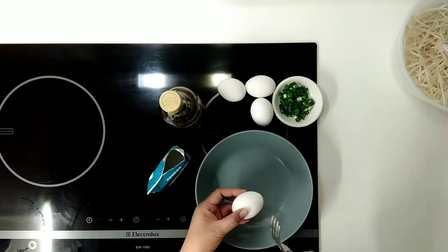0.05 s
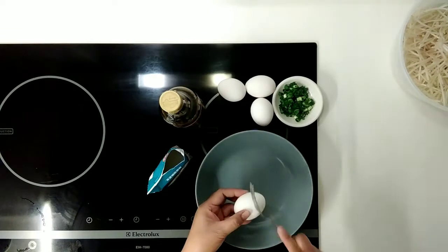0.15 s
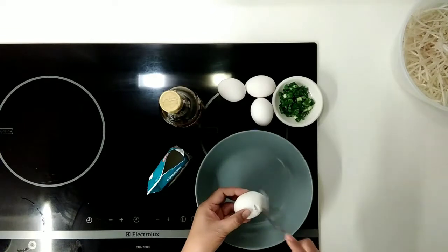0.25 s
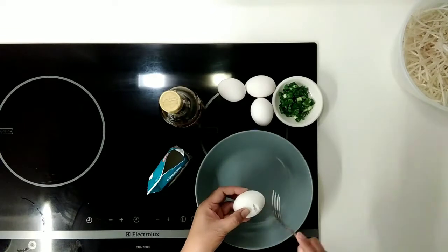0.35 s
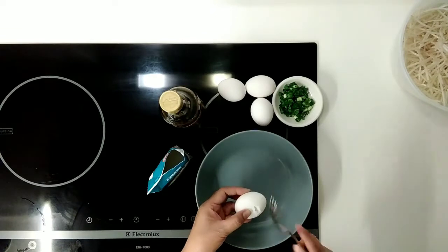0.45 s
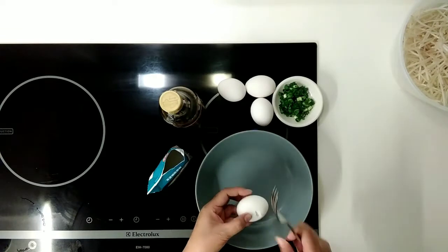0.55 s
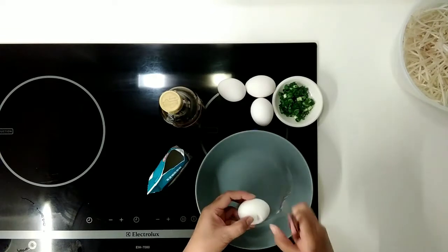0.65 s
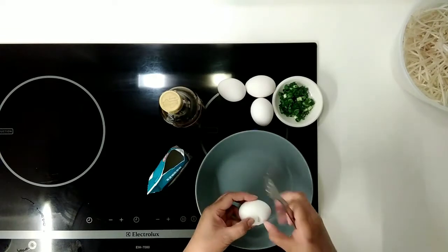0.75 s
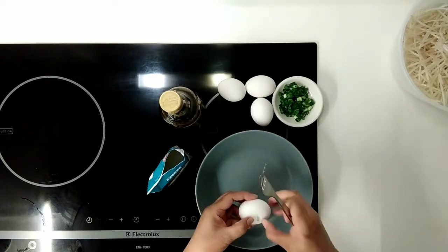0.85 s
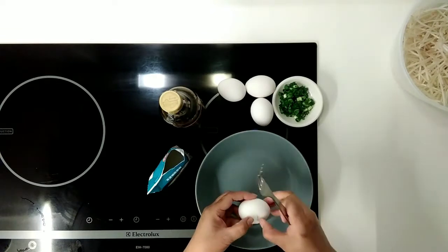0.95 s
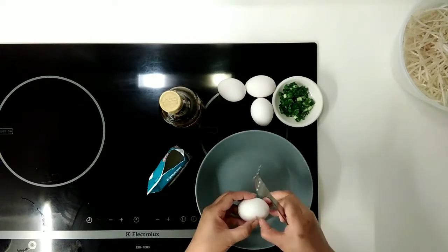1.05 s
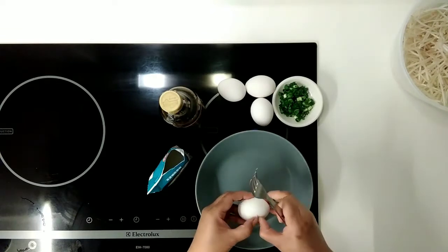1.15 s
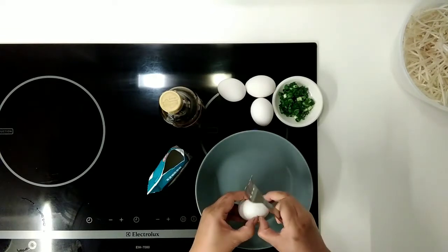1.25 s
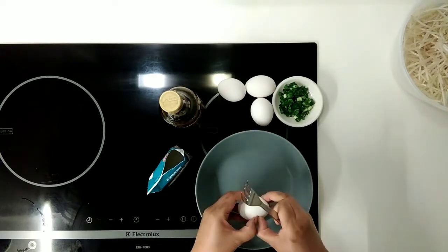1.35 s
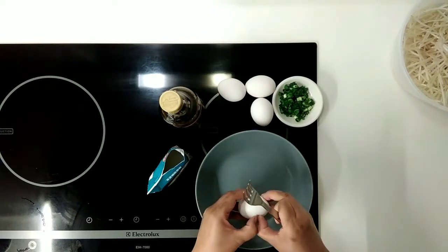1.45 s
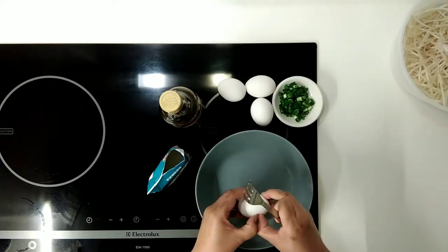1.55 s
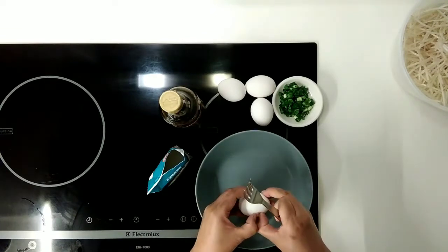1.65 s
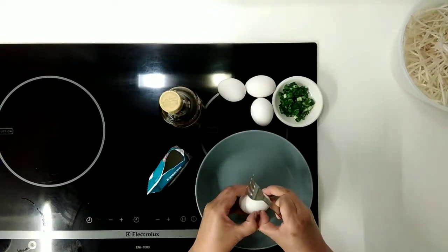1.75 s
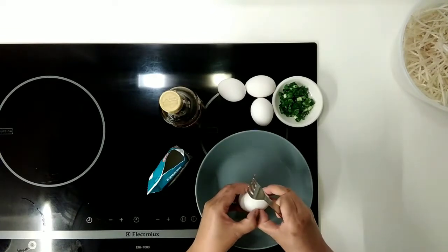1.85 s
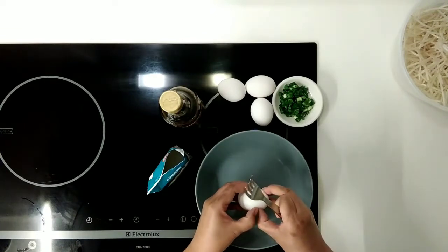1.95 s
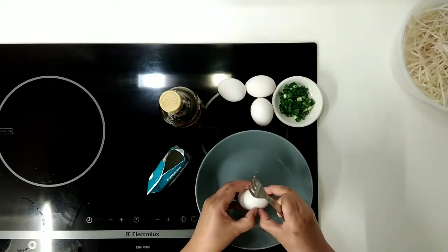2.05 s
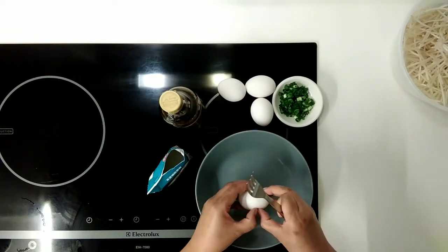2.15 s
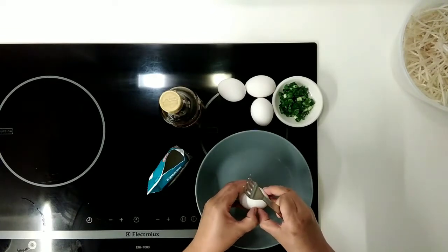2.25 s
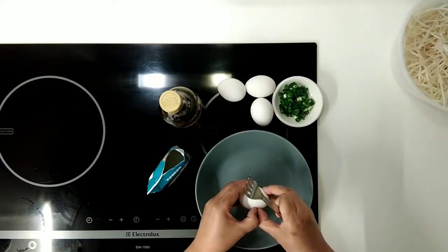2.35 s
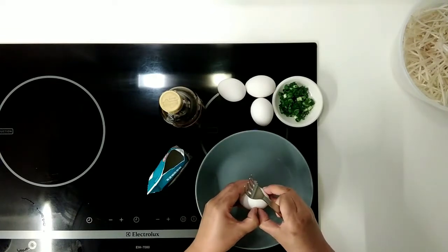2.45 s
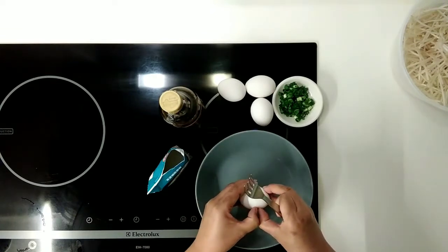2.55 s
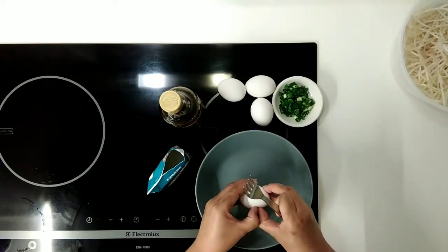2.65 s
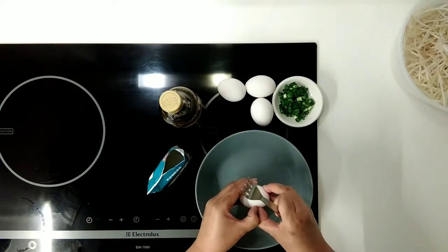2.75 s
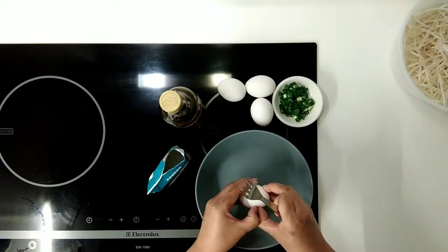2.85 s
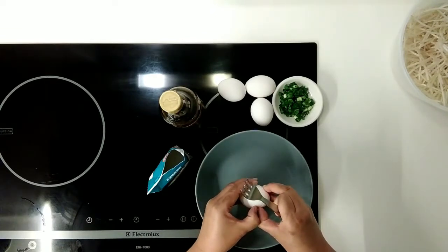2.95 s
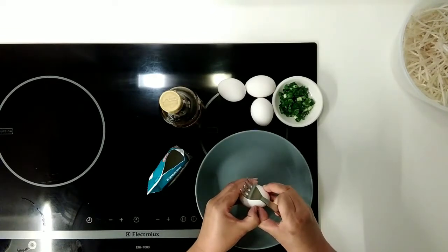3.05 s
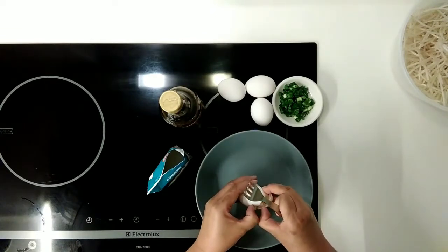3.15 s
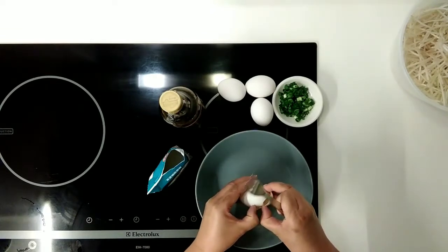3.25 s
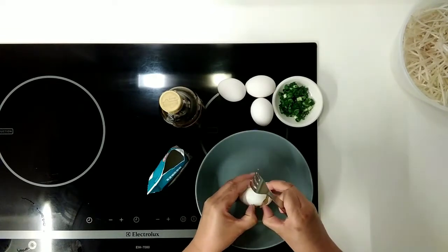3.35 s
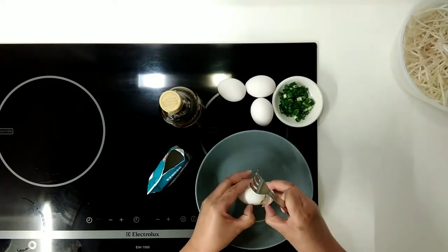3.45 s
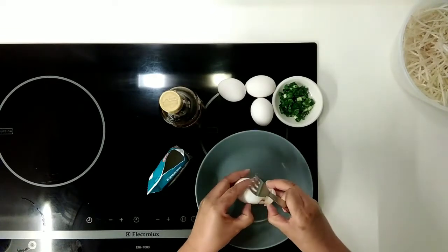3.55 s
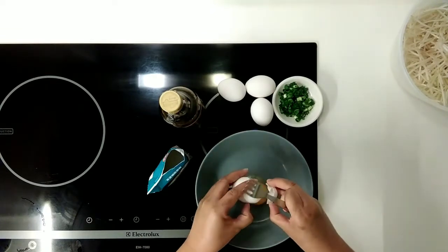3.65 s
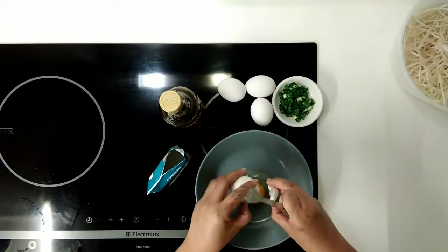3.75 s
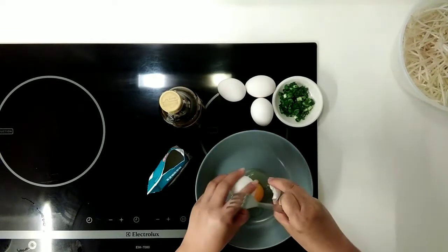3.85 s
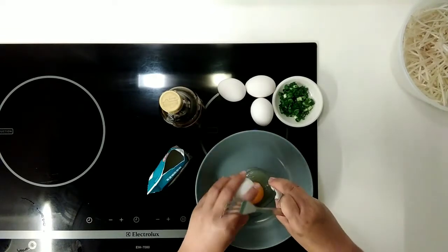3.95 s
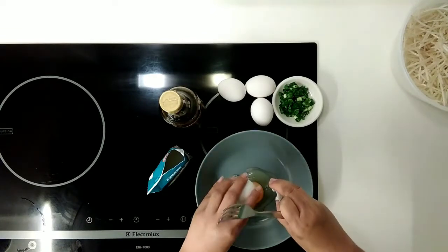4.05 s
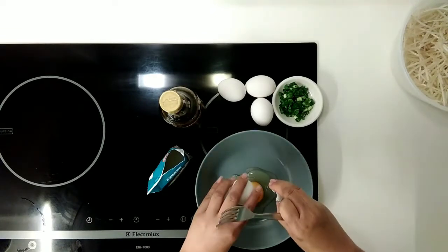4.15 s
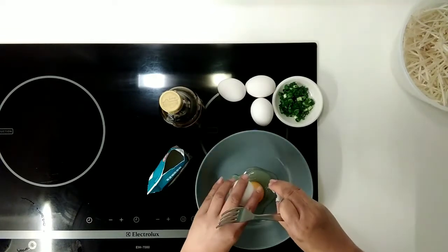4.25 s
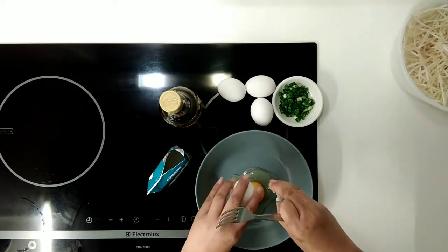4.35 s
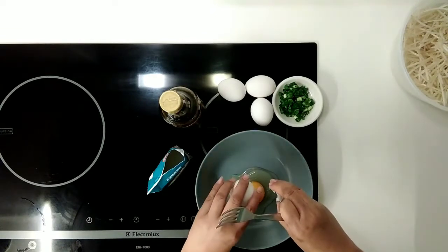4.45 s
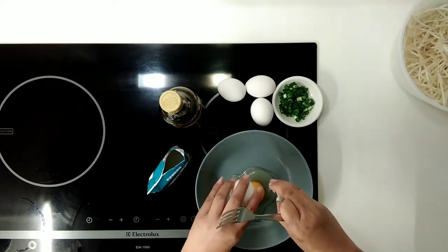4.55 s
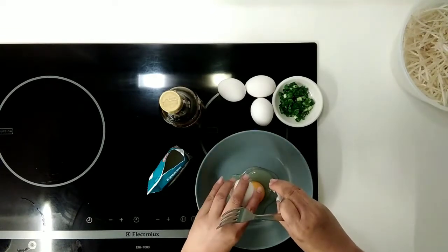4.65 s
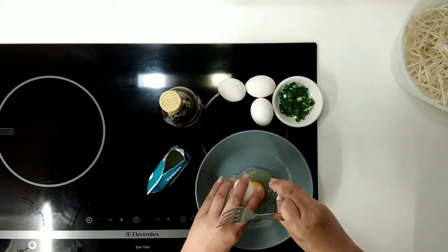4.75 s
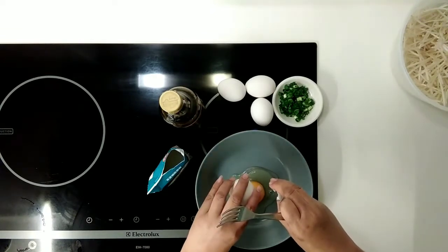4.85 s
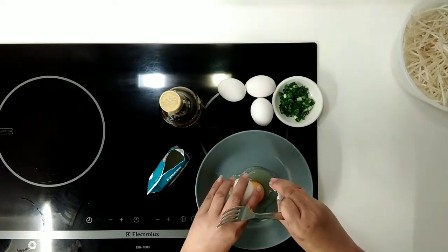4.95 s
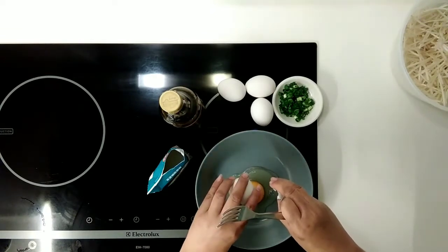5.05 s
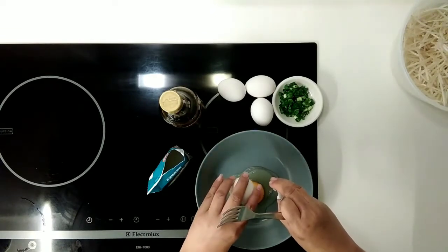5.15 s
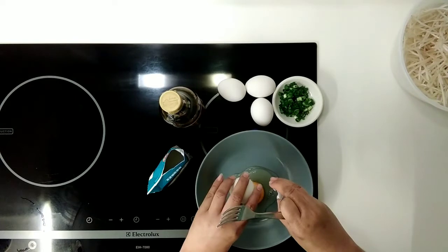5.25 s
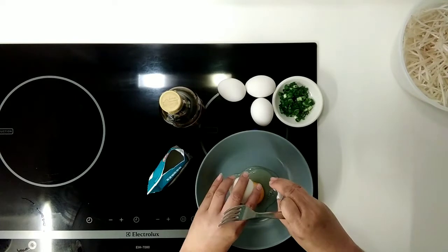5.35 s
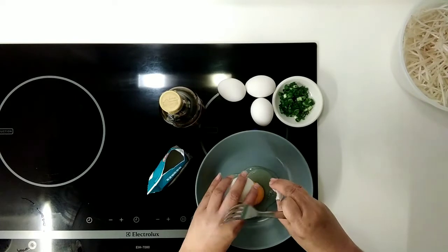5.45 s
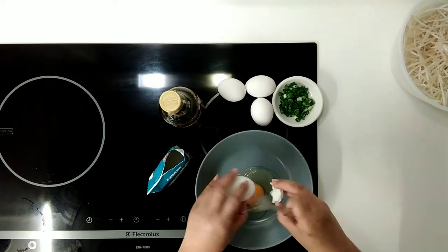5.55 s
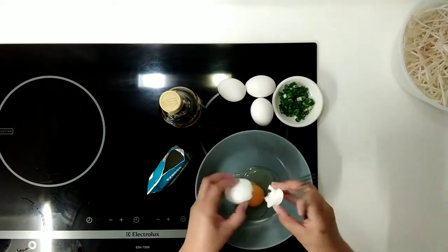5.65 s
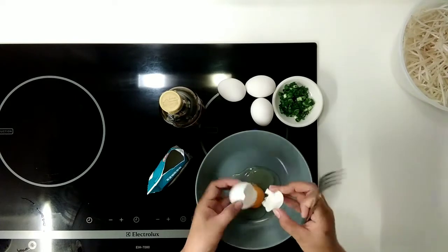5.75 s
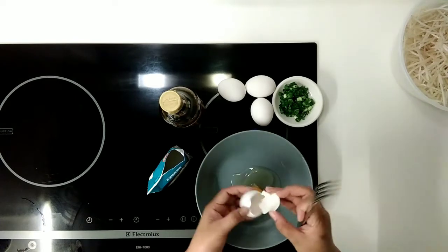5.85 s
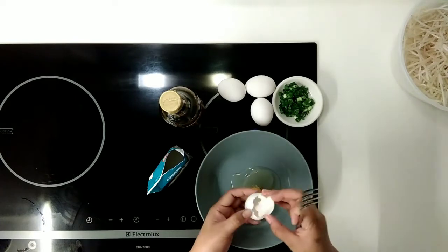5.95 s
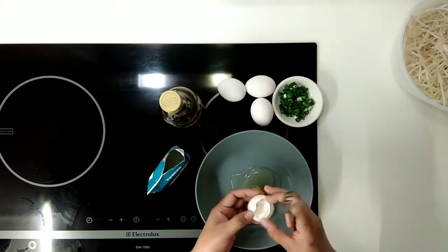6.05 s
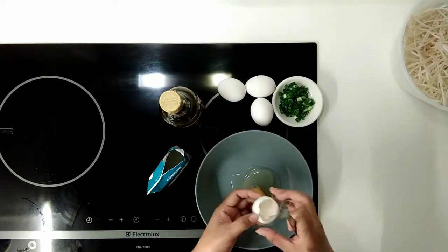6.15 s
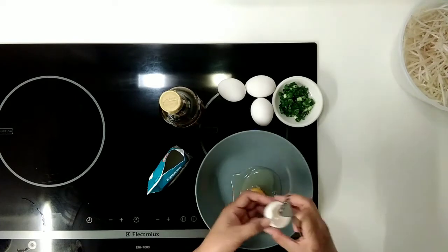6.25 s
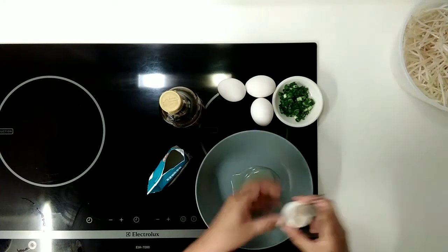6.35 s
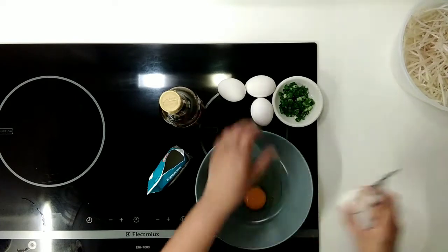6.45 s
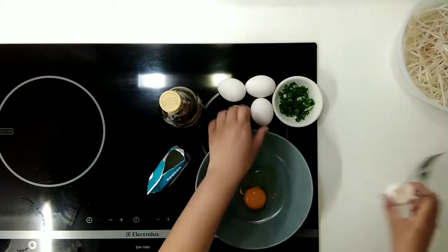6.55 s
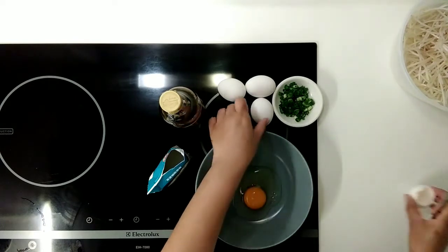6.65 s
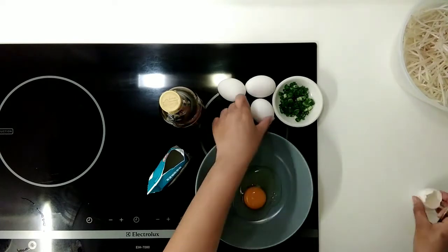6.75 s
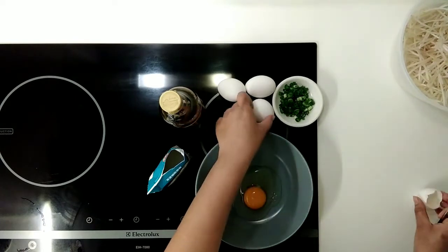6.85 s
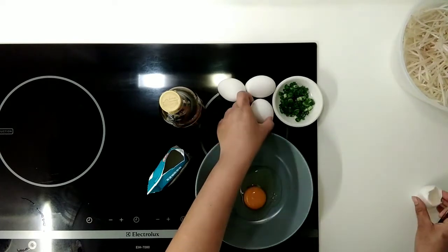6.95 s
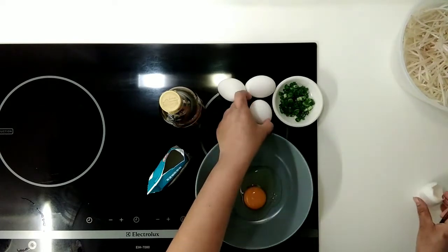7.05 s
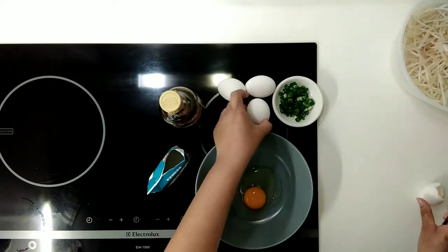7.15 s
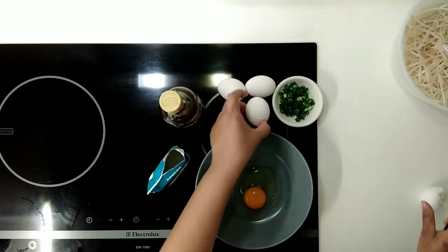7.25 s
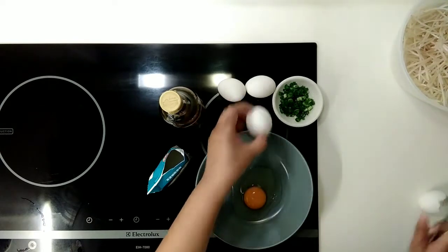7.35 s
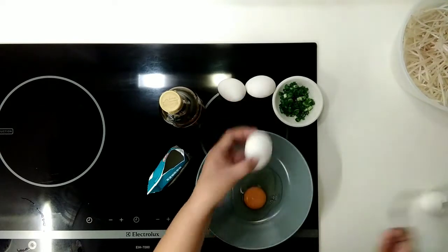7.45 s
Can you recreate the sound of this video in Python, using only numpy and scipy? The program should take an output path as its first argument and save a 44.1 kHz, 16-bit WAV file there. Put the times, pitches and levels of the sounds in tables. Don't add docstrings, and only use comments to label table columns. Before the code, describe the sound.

In a hard kitchen, an egg is struck and pulled open with crisp snaps, between bursts of plastic bag rustling, ending with empty shells knocking the worktop.

```python
import sys
import numpy as np
from scipy import signal
from scipy.fft import rfft, irfft
from scipy.io import wavfile
from scipy.ndimage import uniform_filter1d

SR = 44100
rng = np.random.default_rng(int(sys.argv[2]) if len(sys.argv) > 2 else 0)


def transcribe(signal):
    frames = np.atleast_2d(signal).T
    limited = np.clip(frames, -1, 1)
    pcm = np.round(limited * 32767).astype(np.int16)
    wavfile.write(sys.argv[1], SR, pcm)


def invert_db(level):
    return 10 ** (np.asarray(level, dtype=float) / 20)


N = 330750
T = np.arange(N) / SR

# f/Hz, level/dB per Hz
HUM_TONE = [(15, -49), (25, -13.5), (91, -12), (126, -9), (227, -5.5), (378, -7.5), (482, -3.5), (552, -10),
            (782, -14), (2120, -19), (2300, -19), (4620, -29.5), (6050, -30), (12200, -30.5),
            (15500, -37.5)]
# f/Hz, width/Hz, level/dB
DUCT_MODES = [
    (422.3, 39, -70),
    (740, 86, -75.5),
    (110, 44, -79.5),
]
# f/Hz, level/dB per Hz
FILM_TONE = [(180, -47), (300, -16.5), (417, 1.5), (476, -14), (720, -3.5), (892, -9.5), (1140, -4.5),
             (1970, 9.5), (2520, 12), (4650, 8.5), (4960, 4), (9290, 13.5), (13800, -7.5), (14800, -30.5),
             (15500, -96)]
# peak t/s, level/dB, rise/s, t60/s, brightness/dB
SQUEEZES = [(0.62, -53.5, 0.073, 0.31, -0.5), (0.72, -35, 0.06, 0.6, 4.5), (0.888, -31.5, 0.021, 0.37, 5.5),
            (1.01, -40, 0.068, 0.78, 0.5), (1.265, -58, 0.057, .55, -15), (2.692, -56, 0.089, 0.57, -9.5),
            (2.785, -37, .035, 0.63, 8), (2.87, -38, .08, 0.55, 5), (2.94, -41.5, 0.11, 0.37, 0),
            (3.039, -36, 0.045, 0.41, -0.5), (3.178, -37, 0.034, 0.58, 1), (3.211, -39, .04, 0.57, -1.5),
            (4.624, -43, 0.02, 0.76, 6), (4.698, -41, 0.028, .7, -4), (4.784, -37, 0.11, 0.26, 2.5),
            (4.849, -39.5, 0.034, 0.76, -0.5), (4.917, -35.5, 0.059, 0.47, 0),
            (5.182, -51, 0.1, 1.15, -2.5), (5.44, -60, 0.55, 0.56, -8), (5.09, -58, .1, .5, -10),
            (7.288, -45.5, 0.13, 0.28, -1.5), (7.328, -37, 0.023, 2.5, 12), (7.42, -39.5, 0.13, 0.33, 3)]
# peak t/s, level/dB, rise/s, t60/s, brightness/dB
STIRS = [(0.003, -62.5, 0.011, 0.67, 2.5), (0.2, -62.5, 0.084, 0.87, -12.5), (0.37, -58, 0.073, 1, 0),
         (1.557, -67, 0.31, 0.34, 8), (1.67, -66.5, .03, 0.55, 6), (1.896, -60, 0.023, 0.19, 0),
         (2.0, -63, .03, 1.9, 2.5), (2.6, -64.5, 0.09, 0.64, 13.5), (3.488, -53, 0.037, 0.35, -3),
         (3.779, -57, 0.012, 0.63, 4.5), (3.924, -59.5, 0.048, 0.17, -9), (4.154, -52, 0.045, 0.39, -4.5),
         (4.512, -60, .03, 0.58, 6), (5.87, -60, 0.026, 0.59, -24), (6.07, -51.5, 0.055, 0.13, 5.5),
         (6.12, -54, 0.022, 0.51, -7), (6.238, -46, 0.0093, 0.11, -2), (6.33, -54.5, .06, 1.03, -5.5),
         (6.53, -59, 0.11, 0.17, 0.5), (6.66, -54.5, 0.054, .7, -1), (6.838, -50, 0.049, 0.54, -7),
         (6.98, -58.5, 0.075, 0.75, -4), (7.072, -58.5, 0.3, 0.25, -16)]
# t/s, peak level/dB, t60/s, sheen/dB
CREASES = [(0.606, -39, 0.24, -11), (0.6816, -25, 0.17, -3), (0.704, -27, 0.19, 10.5),
           (0.872, -28.5, 0.29, -1), (0.9979, -41, 0.11, -10), (1.8417, -46.5, 0.19, 1.5),
           (2.748, -29, 0.12, -11), (2.7692, -19.5, 0.18, -3.5), (2.8605, -28, 0.25, -7),
           (3.0244, -46, 0.54, -20), (4.126, -48.5, 0.12, 1), (4.622, -36.5, 0.32, 5.5),
           (4.6944, -28, 0.26, -2.5), (4.8452, -36, 0.36, -10), (4.9085, -26.5, 0.22, 5.5),
           (5.1718, -62, 0.11, 1), (6.022, -38, 0.17, 0), (6.6493, -48, 0.18, -22),
           (7.3125, -28.5, 0.44, 4)]
# t/s, peak level/dB, t60/s
FORK_BLOWS = [
    (0.251, -2, 0.053),
    (0.254, -7, 0.065),
    (0.26, -16, 0.23),
    (0.273, -17, 0.12),
]
# f/Hz, level/dB per Hz
FORK_TONE = [(88, -53.5), (150, -23), (509, -6), (1170, -8.5), (1340, -4), (1510, -3.5), (1730, 3),
             (2020, -4.5), (2810, -0.5), (3480, -11.5), (4480, -1), (5540, -10.5), (9000, -6.5),
             (14100, -20.5), (15500, -49.5)]
# f/Hz, level/dB per Hz
SNAP_TONE = [(400, -30), (800, -17.5), (1300, -11), (2500, -17), (4200, -2.5), (5500, -5.5), (9000, 3),
             (13400, -10.5), (15500, -34.5)]
# t/s, splinter peak level/dB, low ring f/Hz, low ring level/dB, high ring level/dB
HAIRLINES = [(1.2708, -32, 1500, -18, -19), (1.5349, -35, 2600, -28, -13.5),
             (1.664, -40.5, 1140, -15, -9.5), (2.4908, -41, 1276, -26, -21), (3.1866, -17, 1710, -11.5, -9),
             (3.2331, -6, 2020, -11.5, -15.5), (3.2829, -12.5, 1800, -22, -12),
             (3.403, -28, 1530, -15.5, -21.5), (3.4264, -47.5, 1520, -3, -24),
             (3.8008, -38, 1710, -16, -12), (3.8065, -39, 1670, -18, -15),
             (3.8572, -26.5, 1730, -24.5, -14), (6.1244, -37.5, 1580, -13, -4),
             (6.2363, -27.5, 1690, -1.5, -28)]
# t/s, splinter peak level/dB, low ring f/Hz, low ring level/dB, high ring level/dB
FLAKES = [
    (1.8976, -35, 1690, -19.5, -12.5),
    (2.148, -45.5, 1210, -8.5, -22),
    (3.4779, -35, 1540, -11, -9.5),
    (3.4935, -32, 1530, -13, -18.5),
    (6.099, -19, 1575, -18, -10.5),
]
# t/s, splinter peak level/dB, low ring f/Hz, low ring level/dB, high ring level/dB
SPLIT = [
    (3.2155, -3.5, 2160, -29.5, -12),
    (3.2204, -14, 2100, -14, -12.5),
]
# t/s, splinter peak level/dB, low ring f/Hz, low ring level/dB, high ring level/dB
NESTING = [
    (6.0342, -25.5, 1540, -13.5, -14),
    (6.0603, -28, 1670, -11, -14),
]
# t/s, peak level/dB, t60/s
KNOCKS = [
    (6.9064, -20.5, 0.072),
    (6.911, -22, 0.018),
]
# f/Hz, level/dB per Hz
KNOCK_TONE = [(240, -37), (400, -17.5), (884, -38), (1650, 2.5), (1830, 4), (2020, -1), (2370, -10),
              (2710, -5), (3290, -46), (6000, -53), (7800, -73), (13200, -120)]
# t/s, peak level/dB, ring f/Hz, t60/s, upper rattle level/dB
BUMPS = [(0.54, -59, 136, 0.48, -3), (1.803, -59, 177, 0.26, -19.5), (2.473, -50, 183.6, 0.46, -15),
         (2.778, -51, 428, 0.4, -6), (3.233, -56, 462, 0.27, 21), (5.617, -59, 214.5, 0.3, -31),
         (5.659, -52.5, 266.3, 0.15, -19), (5.857, -44.5, 405, 0.54, -6), (5.893, -40, 406.3, 0.19, -2.5),
         (5.971, -50, 399, 0.17, -7), (6, -59, 259, 0.18, 1), (6.81, -59.5, 140, 0.31, 13.5)]
# t/s, peak level/dB, ring f/Hz, t60/s
STEPS = [(0.54, -47.5, 109.3, 0.76), (0.748, -55.5, 89, 0.86), (1.805, -46.5, 105, 0.52),
         (2.019, -63, 73, 0.48), (2.498, -60, 127, 0.71), (2.702, -60, 98.7, 1), (4.098, -66, 94.7, 0.9),
         (4.686, -52, 103, 1), (5.1, -68, 121.7, 0.92), (5.648, -63, 110, 0.7), (5.878, -68, 80.6, 0.44),
         (6.154, -62.5, 110, 0.6), (6.807, -66, 127.7, 0.87), (7.33, -58, 92.5, 0.91)]
# f/Hz, t60/s
ROOM_DECAY = [(250, .3), (1000, .22), (2000, .17), (4000, .19), (12000, .2)]
# f/Hz, level/dB
MIC_TONE = [(25, -11), (70, 2.5), (4600, -3), (5300, -5.5), (6300, -1), (15200, -2), (16300, -25)]

HAIRLINE_HZ, FLAKE_HZ, SPLIT_HZ, NESTING_HZ = 8830, 4390, 3900, 6270
LOW_RING_S, HIGH_RING_S, KICK_S, SNAP_S = .01, .007, .018, .028
ECHO_S, ECHO_DB = .0062, -11
LATE_T60_S, LATE_DB = .9, -27
HUM_DB = -63
RISE_DB, BODY_DB, SHEEN_DB = 18, -2, -4
BODY_LEAN, SHEEN_LEAN = -.9, 0.71
PORT_HZ, PORT_DB = 643, -13


def unit(x):
    return x / np.sqrt(np.mean(x ** 2))


def gains(table, hz):
    table = np.array(table)
    return np.interp(np.log(np.maximum(hz, 1)), np.log(table[:, 0]), table[:, 1])


def colour(x, table):
    size = x.shape[-1]
    return irfft(rfft(x) * invert_db(gains(table, np.fft.rfftfreq(size, 1 / SR))), size)


def band(x, lo_hz, hi_hz):
    sos = signal.butter(2, [lo_hz, min(hi_hz, SR / 2.2)], "bandpass", fs=SR, output="sos")
    return signal.sosfilt(sos, x)


def fade(t, t60):
    return np.exp(-np.log(1000) * t / t60)


def add(out, s, x):
    i = int(s * SR)
    x = x[..., :N - i]
    out[..., i:i + x.shape[-1]] += x


def walk(rate):
    k = int(SR / rate)
    held = np.repeat(rng.standard_normal(N // k + 1), k)
    return unit(uniform_filter1d(uniform_filter1d(held, k), k)[:N])


def patchy(x, depth_db, span_hz, hold_s):
    spec = signal.stft(x, nperseg=512)[2]
    field = rng.standard_normal(spec.shape[1:])
    field = uniform_filter1d(field, max(int(span_hz * 512 / SR), 1), axis=0)
    field = unit(uniform_filter1d(field, max(int(hold_s * SR / 256), 1), axis=1))
    return signal.istft(spec * invert_db(depth_db * field), nperseg=512)[1][:, :N]


def room(x, wet_db, gap_s):
    t = np.arange(SR // 2) / SR
    noise = rng.standard_normal((2, len(t)))
    tail = np.zeros_like(noise)
    for hz in 60 * 2 ** np.arange(9):
        decay = fade(t, gains(ROOM_DECAY, hz)) + invert_db(LATE_DB) * fade(t, LATE_T60_S)
        tail += band(noise, hz / np.sqrt(2), hz * np.sqrt(2)) * decay
    tail = tail * np.clip(t / gap_s, 0, 1)
    tail = tail / np.sqrt(np.sum(tail ** 2, axis=1, keepdims=True))
    return x + invert_db(wet_db) * signal.fftconvolve(x.mean(axis=0, keepdims=True), tail, axes=1)[:, :N]


def hum():
    noise = rng.standard_normal((3, N))
    shared = colour(noise[2], [(300, -1.5), (900, -5.0), (2000, -28.5)])
    apart = colour(noise[:2], [(300, -2.5), (900, 1.5)])
    air = unit(colour(patchy(shared + apart, depth_db=2.0, span_hz=300, hold_s=.05), HUM_TONE))
    out = air * invert_db(HUM_DB + 3.5 + 1.0 * walk(2.874))
    for hz, width_hz, db in DUCT_MODES:
        mode = unit(band(shared + 0.19 * apart, hz - width_hz / 2, hz + width_hz / 2))
        out += mode * invert_db(db + 3.6 * walk(13))
    return out


def handling():
    power = np.zeros((3, N))
    for s, db, rise_s, t60, bright_db in SQUEEZES + STIRS:
        after = T - s
        on = slice(*np.searchsorted(after, [-3 * rise_s, t60]))
        shape_db = np.where(after[on] < 0, RISE_DB / rise_s, -60 / t60) * after[on]
        lean_db = np.array([[BODY_DB + BODY_LEAN * bright_db], [0], [SHEEN_DB + SHEEN_LEAN * bright_db]])
        power[:, on] += invert_db(db + shape_db + lean_db) ** 2
    return uniform_filter1d(np.sqrt(power), 200, axis=1)


def creasing():
    rush = np.zeros((2, N))
    for s, db, t60, sheen_db in CREASES:
        peak = invert_db([[db - 10.0], [db - 10.0 + sheen_db]])
        add(rush, s, peak * fade(T[:SR // 2], t60))
    return rush


def bag():
    level, rush = handling(), creasing()
    tick_db = 1.8 * np.minimum(rng.exponential(size=N), 5) + 0.41 * walk(90)
    ticks = rng.standard_normal((2, N)) * invert_db(tick_db)
    film = unit(colour(patchy(ticks, depth_db=3.5, span_hz=180, hold_s=.06), FILM_TONE))
    body = colour(film, [(1300, 0), (2200, -40)])
    sheen = colour(film, [(4300, -40), (6300, 0)])
    middle = film - body - sheen
    crumple = np.zeros((2, N))
    for part, gain, lo_hz, hi_hz in zip((body, middle, sheen), level, (600, 1800, 6000), (1600, 5000, 12000)):
        crumple += part * gain / np.std(band(film, lo_hz, hi_hz))
    creases = rush[0] * (film - sheen) + rush[1] * sheen
    return room(invert_db(1.5) * crumple + creases, wet_db=-5.0, gap_s=.006)


def burst(tone, t60, spiky_db):
    t = T[:SR // 8]
    breaks = rng.standard_normal((2, len(t))) * invert_db(spiky_db * rng.exponential(size=len(t)))
    sound = colour(breaks, tone) * fade(t, t60) * np.clip(t / 0.0013, 0, 1) ** 2
    return sound / np.abs(sound).max(axis=1, keepdims=True)


def ring(hz, t60):
    t = T[:SR // 8]
    kicks = rng.standard_normal((2, len(t))) * fade(t, KICK_S) * np.clip(t / .001, 0, 1)
    resonance = np.sin(2 * np.pi * hz * t) * fade(t, t60)
    sound = signal.fftconvolve(kicks, resonance[None], axes=1)[:, :len(t)]
    sound = band(sound, .7 * hz, 1.4 * hz)
    return sound / np.abs(sound).max(axis=1, keepdims=True)


def fork(out):
    for s, db, t60 in FORK_BLOWS:
        add(out, s, invert_db(db - 1.0) * burst(FORK_TONE, t60, spiky_db=2.0))


def shell(out):
    kinds = ((HAIRLINES, HAIRLINE_HZ), (FLAKES, FLAKE_HZ), (SPLIT, SPLIT_HZ), (NESTING, NESTING_HZ))
    for table, high_hz in kinds:
        for s, db, low_hz, low_db, high_db in table:
            low = invert_db(low_db + 7.0) * ring(low_hz, LOW_RING_S)
            high = invert_db(high_db + 8.0) * ring(high_hz, HIGH_RING_S)
            add(out, s, invert_db(db - 1.0) * (burst(SNAP_TONE, SNAP_S, spiky_db=3.5) + low + high))


def knocks(out):
    for s, db, t60 in KNOCKS:
        add(out, s, invert_db(db + 4.5) * burst(KNOCK_TONE, t60, spiky_db=3.5))


def egg():
    out = np.zeros((2, N))
    fork(out)
    shell(out)
    knocks(out)
    out = colour(out, [(90, -33), (300, 1)])
    add(out, ECHO_S, invert_db(ECHO_DB) * out[::-1])
    return room(out, wet_db=-8.0, gap_s=.003)


def bumps():
    out, t = np.zeros((2, N)), T[:SR // 2]
    for s, db, hz, t60, rattle_db in BUMPS:
        noise = rng.standard_normal((2, len(t)))
        swell = np.clip(t / 0.012, 0, 1) * fade(t, t60)
        body = np.sin(2 * np.pi * hz * t) + 0.5 * unit(band(noise[0], 0.3 * hz, 1.22 * hz))
        rattle = invert_db(rattle_db) * unit(band(noise, 430, 1730)) * fade(t, 0.11)
        add(out, s, invert_db(db + 7.0) * swell * (body + rattle))
    return out


def steps():
    out, t = np.zeros(N), T[:SR]
    for s, db, hz, t60 in STEPS:
        rough = unit(band(rng.standard_normal(SR), 0.25 * hz, 2.0 * hz))
        boom = np.sin(2 * np.pi * hz * t) + .5 * rough
        add(out, s, invert_db(db - 1.0) * np.clip(t / .025, 0, 1) * fade(t, t60) * boom)
    return out


def scene():
    return hum() + bag() + egg() + bumps() + steps()


def band_limit(x):
    return signal.sosfilt(signal.butter(12, 16480, fs=SR, output="sos"), x)


def record(dry):
    right = colour(dry[1], [(0.55 * PORT_HZ, PORT_DB), (0.96 * PORT_HZ, 0), (6000, 0), (12000, -2.5)])
    mix = colour(np.array([dry[0], right]), MIC_TONE)
    return band_limit(mix)


dry = scene()
out = record(dry)
transcribe(out)
```